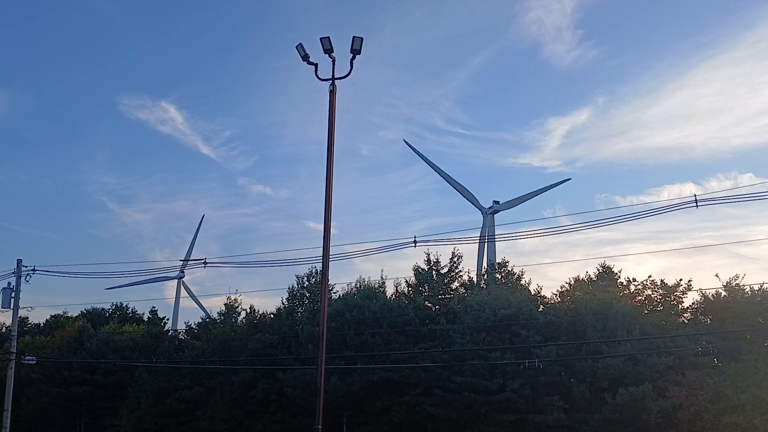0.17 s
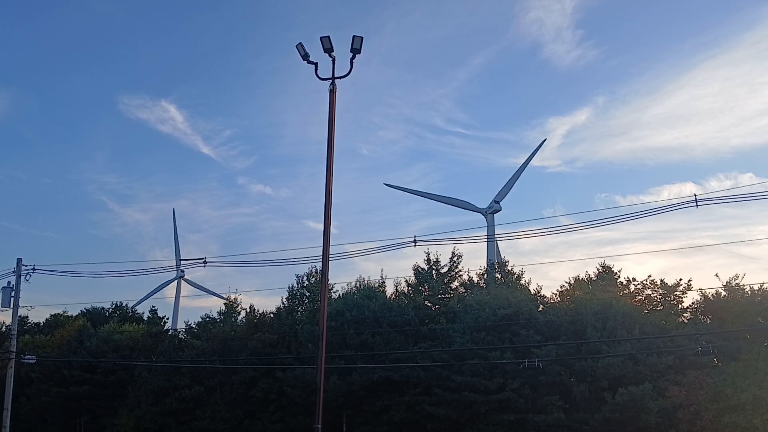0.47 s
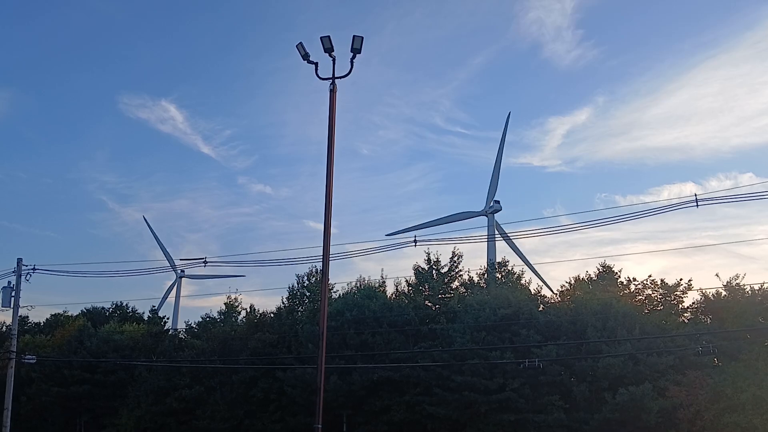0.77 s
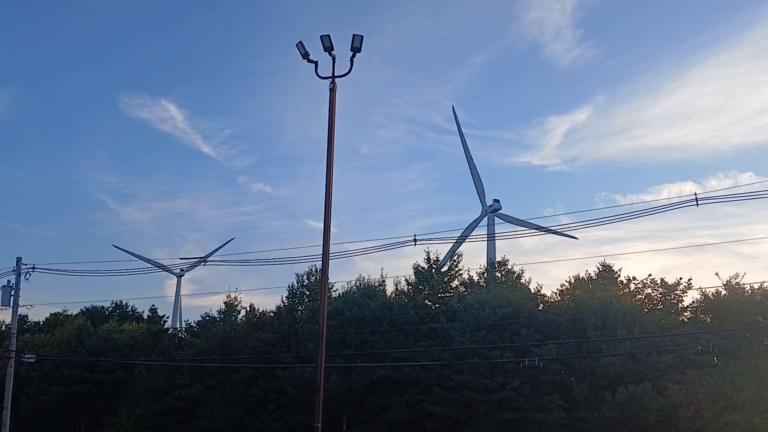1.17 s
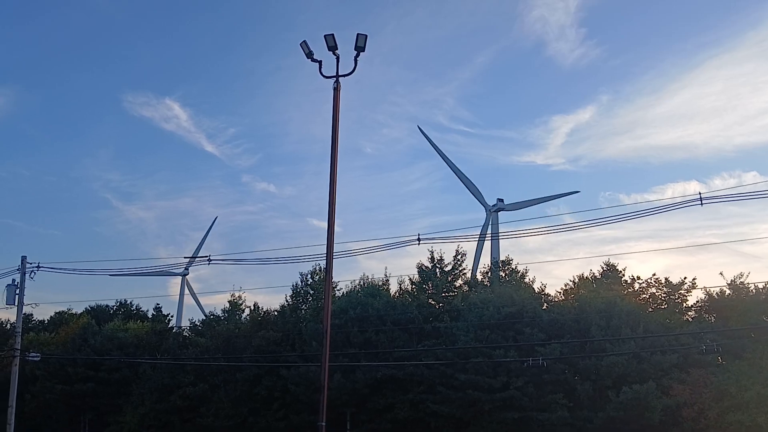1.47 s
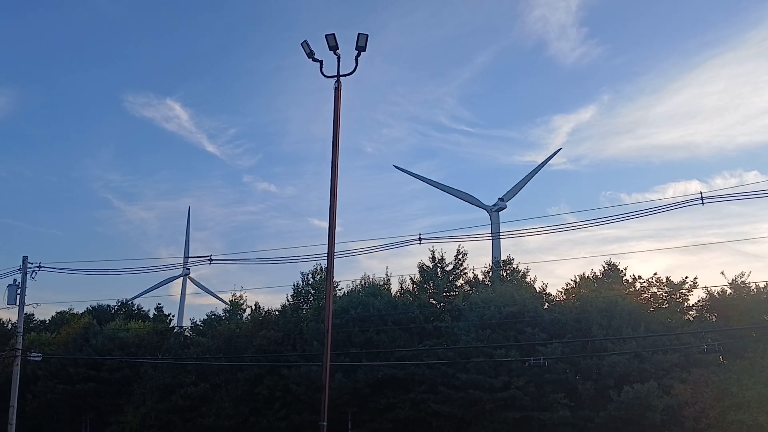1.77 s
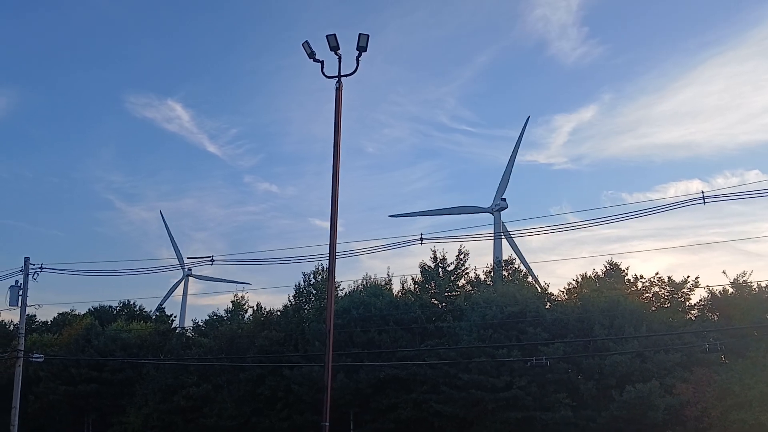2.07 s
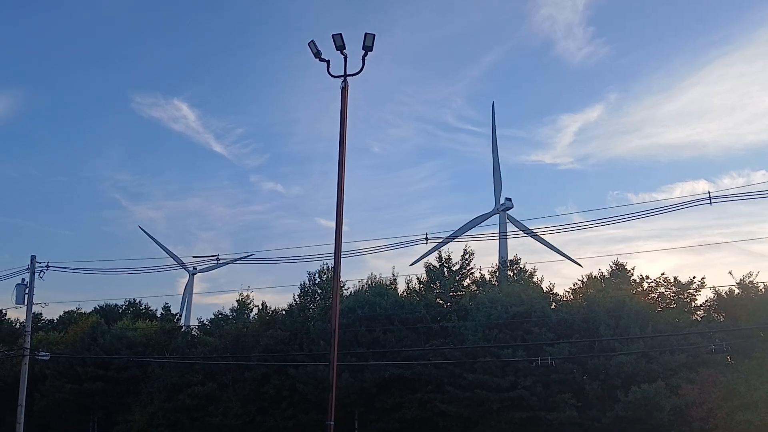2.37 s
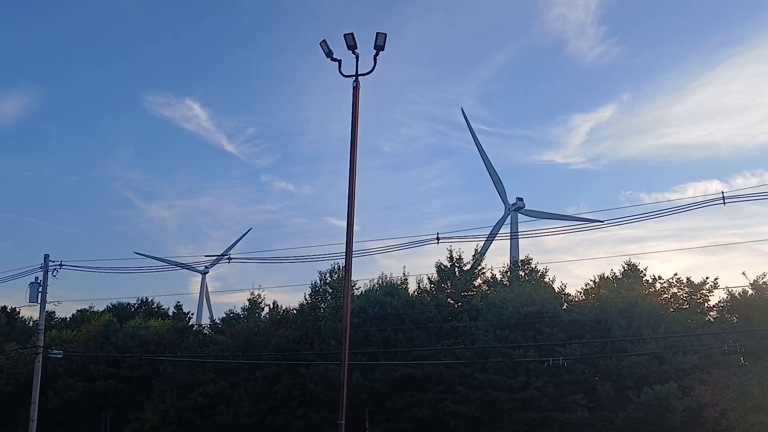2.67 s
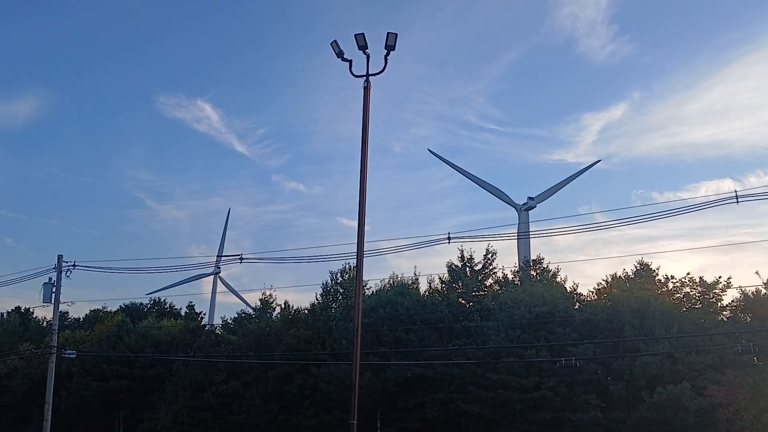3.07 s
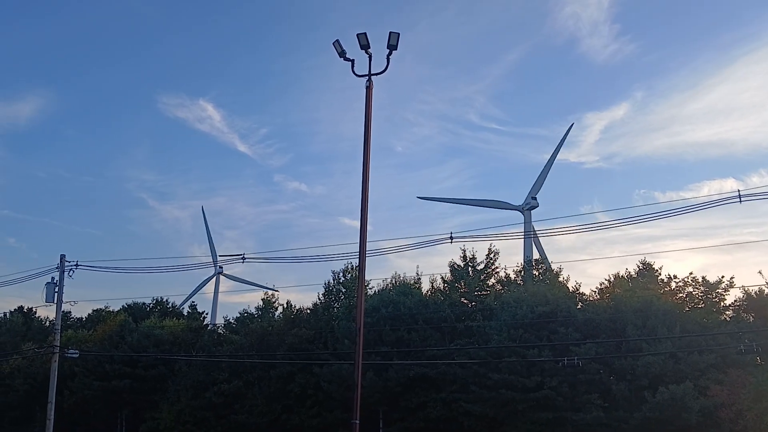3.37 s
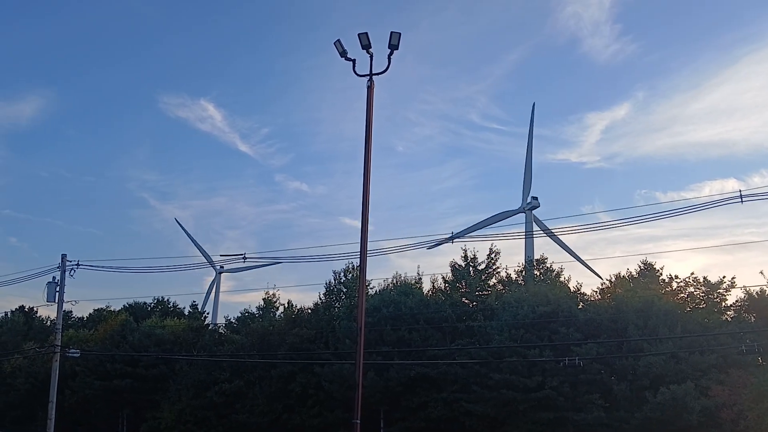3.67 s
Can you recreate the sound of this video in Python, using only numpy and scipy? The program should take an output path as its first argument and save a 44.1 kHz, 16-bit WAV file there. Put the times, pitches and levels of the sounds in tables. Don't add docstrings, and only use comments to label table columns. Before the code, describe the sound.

Distant traffic rush dominates outdoors, with a deep beating drone beneath. Faint breeze in trees, one wide airy blade swish, then a shorter thin one, picked up by a phone's stereo microphones with light hiss.

```python
import sys
import numpy as np
from scipy import signal
from scipy.fft import rfft, irfft, next_fast_len
from scipy.io import wavfile
from scipy.ndimage import uniform_filter1d

SR = 44100
rng = np.random.default_rng(int(sys.argv[2]) if len(sys.argv) > 2 else 0)


def gain_from_db(level_db):
    decades = np.asarray(level_db, float) / 20
    return 10 ** decades


def store_wav(level_fs):
    pcm = np.round(np.clip(np.atleast_2d(level_fs), -1, 1) * 32767)
    wavfile.write(sys.argv[1], SR, pcm.T.astype(np.int16))


N = 168462
TRAFFIC_FLICKER_DB = 0.45


def read(table, hz, col=1):
    table = np.array(table, float)
    return np.interp(np.log(hz), np.log(table[:, 0]), table[:, col])


def curve(table, col=1):
    table = np.array(table, float)
    return np.interp(np.arange(N) / SR, table[:, 0], table[:, col])


def walk(rate_hz):
    hold = int(SR / rate_hz)
    steps = np.repeat(rng.standard_normal(N // 500), hold)[:N]
    return 1.54 * uniform_filter1d(uniform_filter1d(steps, hold), hold)


def even(x):
    window = int(0.18 * SR)
    power = np.mean(x ** 2, axis=0)
    return x / np.sqrt(uniform_filter1d(uniform_filter1d(power, window), window))


def field(shape, source=None):
    # (frequency [Hz], likeness of left and right [0-1])
    likeness = [(30, 1), (70, .985), (140, 0.99), (290, 0.83), (560, 0.66), (1000, 0.3), (2300, 0.21),
                (4000, 0.013)]
    # (frequency [Hz], left minus right [dB])
    port_ring = [(100, -0.74), (2400, -0.5), (3400, -2), (4500, -7.5), (5600, 1.3), (6500, -4), (9000, 1.5),
                 (14000, -3)]
    size = next_fast_len(N)
    hz = np.maximum(np.arange(size // 2 + 1) * SR / size, 1)
    mid, side = rfft(rng.standard_normal((2, size)), axis=1)
    alike, lag_ms, pan_db = source or (read(likeness, hz), 0, 0)
    alike = np.clip(alike, -.99, .99)
    pan = gain_from_db((read(port_ring, hz) + pan_db) / 2)
    mid = mid * np.sqrt(1 + alike)
    side = side * np.sqrt(1 - alike)
    late = np.exp(-2j * np.pi * hz * lag_ms / 1000)
    ports = np.array([(mid + side) * pan, (mid - side) / pan * late])
    return hz, ports * shape(hz), size


def rush(colour, flicker_db, rate_hz, tilt_db=0, tilt_hz=1000, source=None):
    low_hz, high_hz = colour[0][0], colour[-1][0]

    def shape(f):
        edges = np.clip(f / low_hz, 0, 1) ** 4 * np.clip(high_hz / f, 0, 1) ** 6
        return gain_from_db(read(colour, f)) * edges

    hz, spec, size = field(shape, source)
    first = np.floor(2 * np.log2(low_hz)) - 1
    last = 2 * np.log2(min(high_hz, SR / 2)) + 2
    out = 0
    for centre in np.arange(first, last):
        band = np.cos(np.pi / 2 * np.clip(2 * np.log2(hz) - centre, -1, 1)) ** 2
        pitch = 2 ** (centre / 2) / tilt_hz
        share = 1 / (1 + pitch ** 4) / (1 + (.35 / pitch) ** 4)
        level_db = flicker_db * walk(rate_hz) + share * tilt_db
        out = out + irfft(spec * band, size, axis=1)[:, :N] * gain_from_db(level_db)
    return out / np.sqrt(np.mean(irfft(spec, size, axis=1) ** 2))


def road():
    # (time [s], level [dB], dull roar against bright [dB])
    roar = [(.1, -36, 3), (.5, -35.5, -0.3), (1.0, -34, 0), (1.3, -34, -0.5), (1.6, -33, 5), (1.9, -36, 6),
            (2.2, -35, 2), (2.55, -35.5, 3.2), (2.8, -38.5, 3.2), (3.15, -32.5, -2), (3.5, -36, 1),
            (3.8, -34, -1.8)]
    # (frequency [Hz], density [dB per Hz])
    colour = [(110, -6.5), (330, -12.5), (420, -16), (650, -10), (1500, -10.5), (2350, -19), (2900, -30),
              (4000, -34.5)]
    dull_db = curve(roar, col=2)
    noise = rush(colour, TRAFFIC_FLICKER_DB, rate_hz=6.48, tilt_db=dull_db, tilt_hz=1170)
    return noise * gain_from_db(curve(roar))


def rumble():
    # (time [s], level [dB])
    engine = [(.1, -38.5), (.3, -34), (.62, -35.5), (.8, -32), (1.02, -33.5), (1.22, -33.5), (1.5, -38),
              (1.65, -39), (1.77, -37), (2.05, -35), (2.3, -39.5), (2.54, -34.5), (2.74, -30.5),
              (2.98, -37), (3.2, -40.5), (3.4, -37.5), (3.6, -41), (3.8, -39.5)]
    # (frequency [Hz], density [dB per Hz])
    colour = [(22, -39), (40, -22), (60, -4), (78, 0), (100, -2.5), (125, -9), (160, -17)]
    # (frequency [Hz], width [Hz], level [dB; first two against the rumble])
    drones = [
        (78.4, 5.3, -3),
        (89.5, 2.6, -9),
        (235.1, 2.7, -52),
        (971, 3.2, -55),
    ]
    lines = []
    for centre_hz, width_hz, db in drones:
        hz, spec, size = field(lambda f: 1 / (1 + ((f - centre_hz) / width_hz * 2) ** 2))
        lines.append(even(irfft(spec, size, axis=1)[:, :N]) * gain_from_db(db))
    bass = rush(colour, TRAFFIC_FLICKER_DB, rate_hz=9) + lines[0] + lines[1]
    return even(bass) * gain_from_db(curve(engine)) + sum(lines[2:])


def breeze():
    # (time [s], level [dB])
    wind = [
        (.1, -58.5),
        (.6, -60.5),
        (1.3, -55),
        (2.3, -55.5),
        (2.75, -56),
        (3.4, -57),
        (3.8, -55.5),
    ]
    # (frequency [Hz], density [dB per Hz])
    colour = [(2000, -13), (3600, -11), (4400, -5), (5600, -12.5), (7500, -18.5), (10000, -22),
              (13000, -23)]
    return rush(colour, flicker_db=0.5, rate_hz=4.6) * gain_from_db(curve(wind))


def hiss():
    # (frequency [Hz], density [dB per Hz])
    colour = [(5000, -0.19), (16500, -1)]
    return rush(colour, flicker_db=0, rate_hz=4) * gain_from_db(-67)


def swish(gust, colour, source):
    rustle_db = 0.6 * walk(14)
    return rush(colour, flicker_db=0.5, rate_hz=7.6, source=source) * gain_from_db(curve(gust) + rustle_db)


def wide_swish():
    # (time [s], level [dB])
    gust = [
        (.1, -54),
        (.2, -57),
        (.36, -69),
        (1.0, -61),
        (1.12, -55.5),
        (1.48, -52.5),
        (1.76, -46.5),
        (2.02, -51.5),
        (2.2, -68),
    ]
    # (frequency [Hz], density [dB per Hz])
    colour = [(2200, -5.5), (3600, 0), (4700, 2), (5700, -9), (7000, -8), (8000, -16.5), (11000, -15.5),
              (13500, -22)]
    fade_s = 0.3
    fade = np.clip((gust[-1][0] + fade_s - np.arange(N) / SR) / fade_s, 0, 1)
    return fade * swish(gust, colour, source=(.55, -.37, -.5))


def thin_swish():
    # (time [s], level [dB])
    gust = [
        (2.3, -65),
        (2.84, -67),
        (2.94, -51.5),
        (3.04, -53.5),
        (3.18, -53),
        (3.31, -58.5),
        (3.45, -68),
        (3.65, -62.5),
        (3.8, -64.5),
    ]
    # (frequency [Hz], density [dB per Hz])
    colour = [(2500, -10), (3600, -12), (4400, 3), (6400, -4), (7400, -11.5), (9200, -8.5), (11000, -18),
              (13000, -21)]
    return swish(gust, colour, source=(.75, -.03, 2))


def scene():
    return road() + rumble() + breeze() + hiss() + wide_swish() + thin_swish()


def top_cut(x):
    return signal.sosfilt(signal.butter(12, 16540, fs=SR, output="sos"), x)


def record(dry):
    start_s, open_s, top_hz = 0.0722, 0.00007, 15730
    opening = np.clip((np.arange(N) / SR - start_s) / open_s, 0, 1)
    low_pass = signal.ellip(12, .2, 80, top_hz, fs=SR, output="sos")
    mix = signal.sosfilt(low_pass, dry * opening)
    return top_cut(mix)


dry = scene()
out = record(dry)
store_wav(out)
```